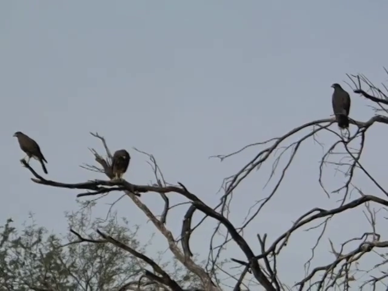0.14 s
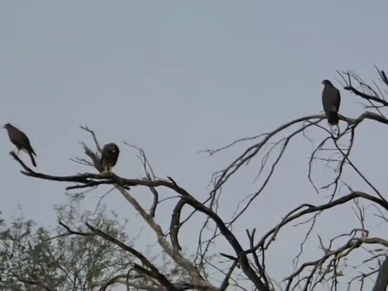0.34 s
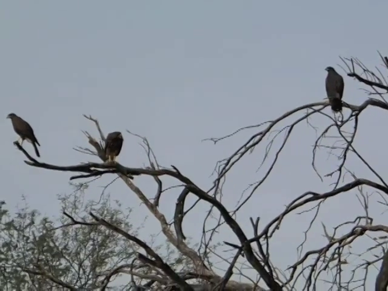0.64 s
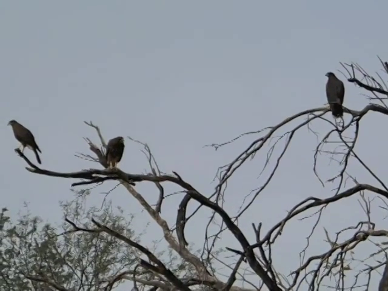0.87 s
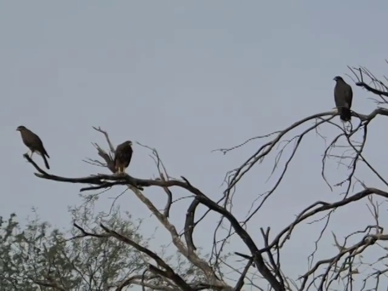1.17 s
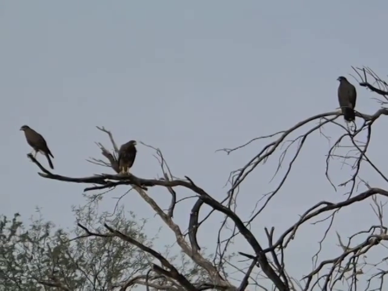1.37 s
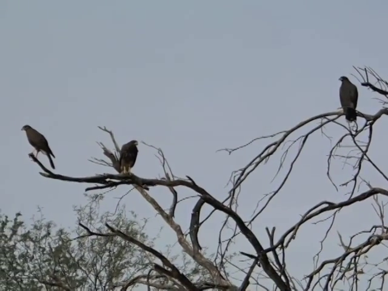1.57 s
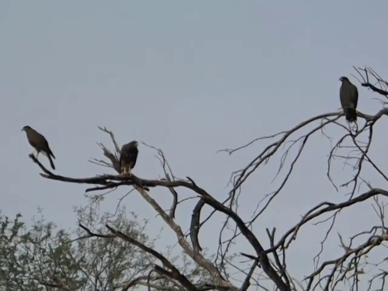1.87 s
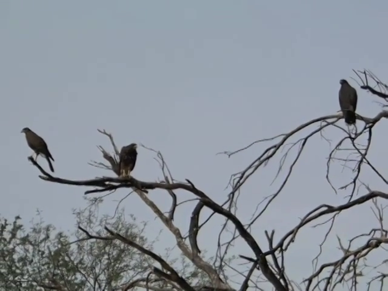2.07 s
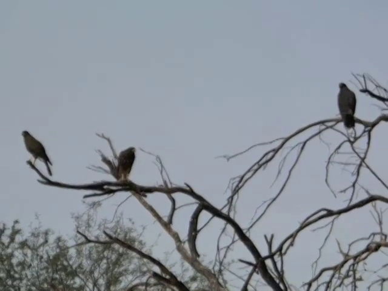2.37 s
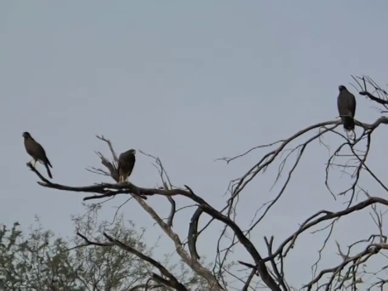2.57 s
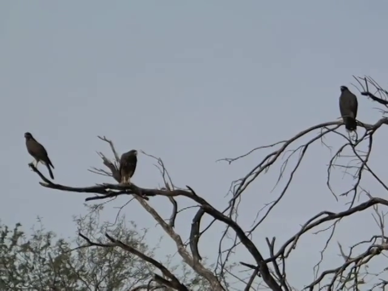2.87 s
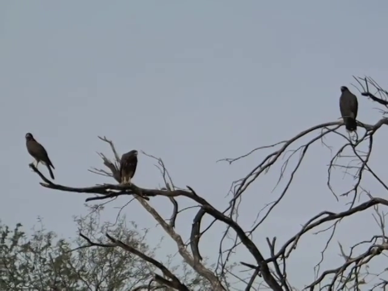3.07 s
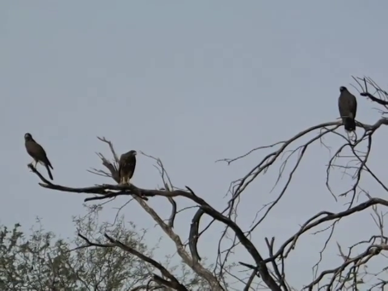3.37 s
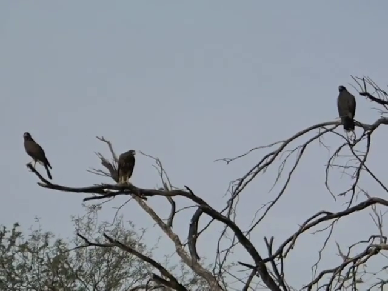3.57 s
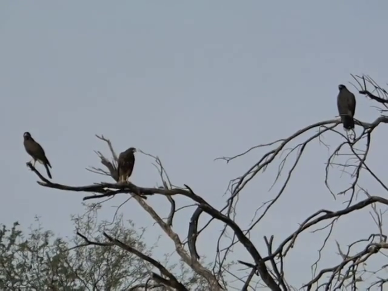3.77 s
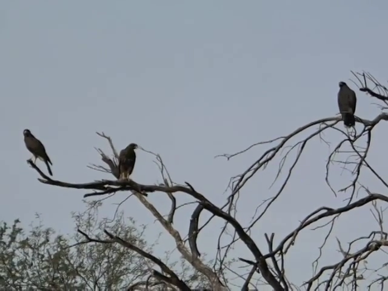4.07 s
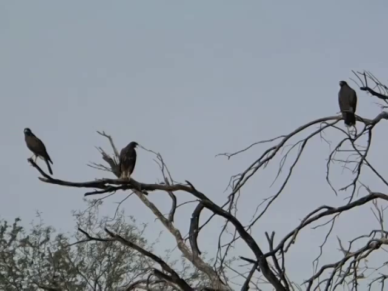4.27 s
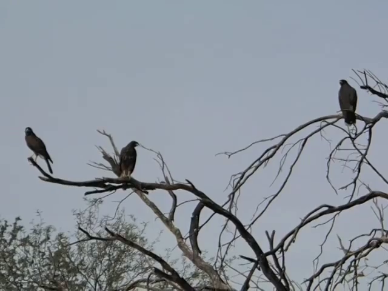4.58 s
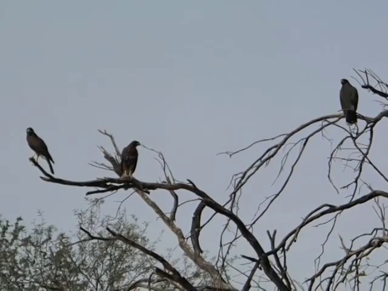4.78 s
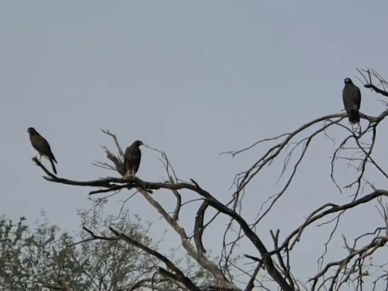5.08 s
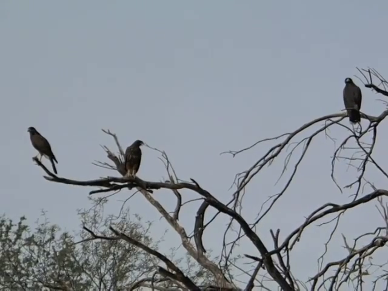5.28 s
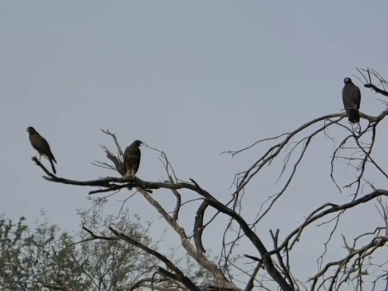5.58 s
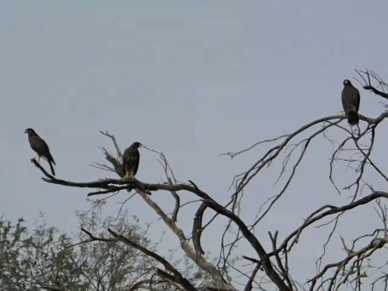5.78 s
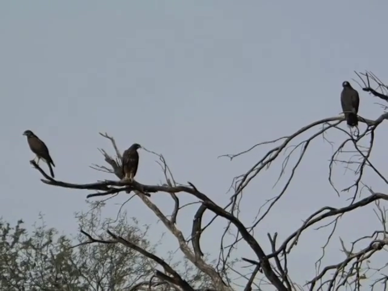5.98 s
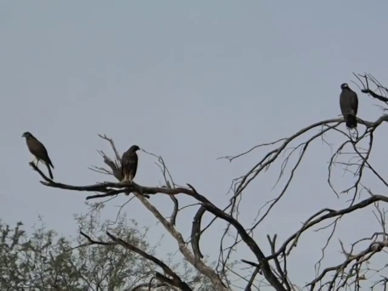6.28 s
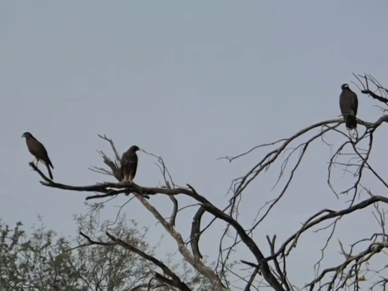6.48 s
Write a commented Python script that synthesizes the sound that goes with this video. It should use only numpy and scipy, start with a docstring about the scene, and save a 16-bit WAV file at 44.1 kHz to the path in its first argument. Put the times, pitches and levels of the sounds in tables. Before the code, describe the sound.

A young hawk gives five shrill rising squeals in open desert, with distant dull shots, tiny bird chirps, and camera lens ticking close by.

```python
"""A hawk gives five rising squeals in open desert: one membrane sings a gliding line with harmonics.
A second, unsteady membrane adds a rasp and leads in three lower openings; the scrub echoes the calls.
A small bird chirps in fluttering arches; shots pop far away, each a dull crack and a decaying noise.
Right beside the microphone a lens drive whines in short steps, and knocks ring the camera housing.
Underneath lie shaped noise for air and hiss, and a faint low drone."""
import sys
import numpy as np
from scipy import signal
from scipy.fft import rfft, irfft, next_fast_len
from scipy.io import wavfile
from scipy.ndimage import map_coordinates

SR = 44100
rng = np.random.default_rng(int(sys.argv[2]) if len(sys.argv) > 2 else 0)


def generate_wav(sig):
    """Save sig (samples, or channels by samples) to the path in sys.argv[1] as 16-bit PCM at SR."""
    pcm = np.round(np.clip(np.atleast_2d(sig).T, -1, 1) * 32767).astype(np.int16)
    wavfile.write(sys.argv[1], SR, pcm)


N = 292824


def amp(db):
    """Decibels to gain."""
    return 10 ** (np.asarray(db) / 20)


def unit(x):
    """Scale to rms 1."""
    return x / np.sqrt(np.mean(x ** 2) + 1e-20)


def along(points, hz):
    """Interpolate (f/Hz, value) points on a log frequency axis."""
    f, v = np.transpose(points)
    return np.interp(np.log(hz + 1), np.log(f + 1), v)


def wobble(rate, size):
    """A smooth random curve, rate knots a second."""
    knots = rng.standard_normal(int(size * rate / SR) + 4)
    return map_coordinates(knots, [np.arange(size) * rate / SR])


def filtered(x, response):
    """Filter x by a complex response of frequency."""
    size = x.shape[-1]
    m = next_fast_len(size + 8192)  # room for the filter to ring out
    return irfft(rfft(x, m) * response(np.fft.rfftfreq(m, 1 / SR)), m)[..., :size]


def noise(spectrum, size):
    """Noise of rms 1, coloured by (f/Hz, level/dB) points."""
    return unit(filtered(rng.standard_normal(size), lambda hz: amp(along(spectrum, hz))))


def resonances(modes, f):
    """Causal response of damped modes: (f/Hz, width/Hz, level/dB)."""
    return sum(amp(db) * 1j * f * w / (c * c - f * f + 1j * f * w) for c, w, db in modes)


def sine(hz):
    """A tone of rms 1 on a pitch curve."""
    return np.sqrt(2) * np.sin(2 * np.pi * np.cumsum(hz) / SR)


def faded(x, edge, release=None):
    """Soft start and stop, in seconds; the stop is as long as the start unless given."""
    t = np.arange(len(x)) / SR
    return x * np.clip(np.minimum(t / edge, (t[-1] - t) / (release or edge)), 0, 1)


def add(track, s, x):
    """Mix x into the track at time s."""
    part = track[max(round(s * SR), 0):][:len(x)]
    part += x[:len(part)]


def leaning(lean, hz):
    """Left and right gains that share out a level difference by frequency."""
    return amp(np.array([[.5], [-.5]]) * along(lean, hz))


def placed(x, lean, lead_ms):
    """Two microphone ports: a level difference by frequency and a small lead on the left."""
    side = np.array([[.5], [-.5]])
    return filtered(x, lambda hz: leaning(lean, hz) * np.exp(2j * np.pi * hz * side * lead_ms / 1000))


# colour of the distant air: f/Hz, level/dB
AIR_COLOUR = [(15, -79), (25, -33), (70, -12), (124, -6), (156, -7.5), (252, -8), (409, -8), (441, -7),
              (486, -8), (535, -7.5), (866, -7.5), (1070, -9), (2500, -16.5), (3250, -32), (5500, -120)]
# colour of the microphone hiss: f/Hz, level/dB
HISS_COLOUR = [(1500, -7.5), (2500, 1), (3400, 0.5), (4050, -7), (4700, 0), (5500, 4.5), (6500, -1.5),
               (8000, -3.5), (12000, -4), (15800, -5.5)]
# likeness of the two microphone ports: f/Hz, likeness (1 = the same)
PORT_LIKENESS = [(60, 0.99), (150, 0.65), (380, 0.068), (950, 0.1), (2380, 0.012), (5980, 0.22),
                 (15000, 0.02)]
# balance of the background: f/Hz, left minus right level/dB
BACKGROUND_LEAN = [(60, -3), (150, -4.5), (380, -4.5), (950, -5), (2380, -4), (5980, -3), (15000, -4.5)]


def background():
    """Distant air and microphone hiss as partly shared noise in two ports, with a faint low drone."""
    air = np.array([amp(-55.5) * noise(AIR_COLOUR, N) + amp(-55.5) * noise(HISS_COLOUR, N) for _ in range(2)])

    def mid_side_gains(hz):
        angle = np.arccos(np.clip(along(PORT_LIKENESS, hz), -.85, .85)) / 2
        return np.array([np.cos(angle), np.sin(angle)])

    mid, side = filtered(air * amp(0.21 * wobble(3.33, N)), mid_side_gains)
    drone = sine(132 + 4 * wobble(23, N))
    mid = mid + amp(-70.5 + 0.5 * wobble(4.53, N)) * drone
    return filtered(np.array([mid + side, mid - side]), lambda hz: leaning(BACKGROUND_LEAN, hz))


# the lens drive hunts for focus in runs of evenly spaced ticks:
# first tick t/s, last tick t/s, motor whine before each tick f/Hz, motor whine after it f/Hz
FOCUS_RUNS = [(1.5444, 1.5444, 4760, 4800), (1.6107, 1.8774, 6230, 6230), (2.4448, 2.4448, 4760, 4800),
              (2.5111, 2.5778, 6240, 6240), (2.645, 2.9118, 6230, 4810), (2.9785, 3.5788, 4820, 6210)]
TICK_PERIOD_S = .0667


def tick_beat():
    """The steady beat of the focus runs: (t/s, whine before f/Hz, whine after f/Hz) for each tick."""
    return [(s, *whines) for first, last, *whines in FOCUS_RUNS
            for s in np.arange(first, last + TICK_PERIOD_S / 2, TICK_PERIOD_S)]


# single knocks of the lens, off the beat: t/s, low modes level/dB, high modes level/dB
KNOCKS = [(0.2123, -50, -42), (0.2141, -47, -31.5), (1.409, -64, -49), (1.4405, -41.5, -44.5),
          (2.104, -40.5, -45), (2.3133, -35.5, -27.5), (2.319, -42, -46.5), (2.3275, -31.5, -27),
          (2.682, -51, -52), (3.6434, -64, -51.5), (3.8845, -64, -46.5)]
# low and high modes of the camera housing: f/Hz, width/Hz, level/dB
HOUSING_LOW = [(980, 89, 0.5), (1270, 105, -0.5), (1993, 400, 4.5), (2675, 134, 9.5), (3540, 110, 1.5)]
HOUSING_HIGH = [(5140, 820, 2), (6400, 670, -5), (8140, 700, -1)]
TICK_LOW_DB, TICK_HIGH_DB, TICK_SCATTER_DB = -41, -41.5, .6  # mean levels; scatter is a standard deviation


def lens_ticks():
    """Each tick or knock is a sharp contact and a faint scrape that ring the camera housing."""
    out, t = np.zeros(N), np.arange(1024) / SR

    def burst(x):
        """Give the burst the energy of 5 ms at rms 1."""
        return x * np.sqrt(.005 * SR) / np.linalg.norm(x)

    def path(f):
        """Bending waves bring the treble first; the plastic damps the very top."""
        return np.exp(-2j * np.pi * .13 * np.sqrt(f)) / (1 + (f / 8500) ** 4)

    def high_path(f):
        return path(f) * resonances(HOUSING_HIGH, f) * resonances([(5080, 820, 0)], f)

    ticks = []
    for s, *_ in tick_beat():
        levels_db = np.array([TICK_LOW_DB, TICK_HIGH_DB]) + TICK_SCATTER_DB * rng.standard_normal(2)
        ticks.append((s, *levels_db))
    for s, low_db, high_db in ticks + list(KNOCKS):
        scrape_decay = amp(-60 * t / .012) + .25 * amp(-60 * t / .04)
        blow = .05 * rng.standard_normal(len(t)) * scrape_decay
        blow[0] += 1  # the sharp contact
        low = burst(filtered(blow, lambda f: path(f) * resonances(HOUSING_LOW, f)))
        high = burst(filtered(blow, high_path))
        add(out, s - .0008, amp(low_db) * low + amp(high_db) * high)
    return out


# the lens slides: t/s, length/s, level/dB
SLIDES = [(0.221, 0.0426, -43.5), (3.637, .065, -62)]
STEP_S, STEP_DB, STEP_SCATTER_DB = 0.023, -56, 1.1  # the motor steps twice for each tick
# one long move of the motor, ending just before the hardest knocks
TRAVEL_START_S, TRAVEL_END_S, TRAVEL_HZ, TRAVEL_DB = 2.084, 2.298, 5780, -55.5


def lens_motor():
    """The motor whines in short steps, before and on each tick, and in one long move; slides rub as noise."""
    out = np.zeros(N)
    whines = []
    for s, before_hz, after_hz in tick_beat():
        for lead, hz in ((TICK_PERIOD_S / 2, before_hz), (0, after_hz)):
            whines.append((s - lead, STEP_S, hz, STEP_DB + STEP_SCATTER_DB * rng.standard_normal()))
    whines.append((TRAVEL_START_S, TRAVEL_END_S - TRAVEL_START_S, TRAVEL_HZ, TRAVEL_DB))
    for s, length, hz, db in whines:
        pitch = hz * (1 + 0.0012 * wobble(430, int(length * SR)))
        add(out, s, amp(db) * faded(sine(pitch), edge=0.0012))
    for s, length, db in SLIDES:
        grit = rng.standard_normal(int(length * SR))
        rub = filtered(grit, lambda f: resonances([(5570, 950, 0)], f) ** 2)
        add(out, s, amp(db) * faded(unit(rub), edge=.002))
    return out


# a small bird's arched chirps: t/s, length/s, top f/Hz, level/dB
CHIRPS = [(0.278, 0.045, 4650, -61), (3.897, 0.04, 5450, -56), (5.342, 0.03, 4600, -53),
          (5.826, 0.0565, 5300, -54), (5.917, 0.029, 4530, -59.5), (6.326, .04, 4900, -67),
          (6.368, 0.028, 4500, -61)]


def small_bird():
    """Each chirp rises and falls in one fluttering arch."""
    out = np.zeros(N)
    for s, length, top_hz, db in CHIRPS:
        u = np.linspace(-1, 1, int(length * SR))
        tone = sine(top_hz * (1 - 0.122 * u ** 2 + 0.019 * wobble(700, len(u))))
        add(out, s, amp(db + 1.6 * wobble(220, len(u))) * faded(tone, edge=0.011))
    return out


# colour of the turbulence in the hawk's throat: f/Hz, level/dB
THROAT_COLOUR = [(1200, -23), (2100, -19), (2620, -5), (3000, -13), (3900, -13), (4450, -8.5), (4750, -12),
                 (5200, -3.5), (5550, 4), (5850, -20), (6400, -9), (7200, -21), (9800, -20.5), (14000, -35)]
OPENING_RISE_HZ, OPENING_SWELL_DB, OPENING_SAG_DB = 245, 12.5, 7.5


def opening(length, start_hz, loudest, level_db, octave_db):
    """Before the voice breaks upward the lower membrane leads, with its octave; the upper one only stirs."""
    size = int(length * SR)
    u = np.linspace(0, 1, size)
    hz = (start_hz + OPENING_RISE_HZ * u) * (1 + 0.0045 * wobble(543, size))
    swell_db = np.interp(u, [0, min(loudest, 1), 1], [-OPENING_SWELL_DB, 0, -OPENING_SAG_DB])
    swell_db = swell_db + 1.9 * wobble(174, size)
    stir_hz = hz + 900 + 80 * wobble(580, size)
    stir_tones = amp(-5.5) * sine(stir_hz) + sine(stir_hz + hz)
    stir = amp(-5.0) * np.linspace(1, .15, size) * stir_tones
    harmonics = amp(-17) * sine(3 * hz) + amp(-25) * sine(4 * hz)
    voice = sine(hz) + stir + harmonics + amp(-12.0) * noise(THROAT_COLOUR, size)
    call = amp(level_db) * voice + amp(octave_db) * sine(2 * hz)
    return faded(amp(swell_db) * call, edge=.012, release=.001)


def dip_db(dips, hz):
    """Loss along a pitch curve as it passes through echo dips."""
    return sum(db * np.exp(-((hz - centre) / width) ** 2) for centre, width, db in dips)


# echoes cancel the line as it glides through certain pitches: f/Hz, width/Hz,
# loss/dB (for the line, at dip depth 1)
LINE_DIPS = [(3295, 22.4, 10), (3346, 13, 11)]
OCTAVE_DIPS = [(6530, 55, 5)]
FALL_S, FALL_HZ = .06, 463  # every squeal ends in a quickening drop of pitch
ATTACK_DB, ATTACK_S = 6.5, 0.051  # the voice starts this much weaker and catches up
PUSH_DB, PUSH_WIDTH = 1.5, 0.067  # a last push at the top of the rise; its width is a share of the rise
SWELL_DB, OCTAVE_SWELL_DB = 3, 5  # growth along the rise: the call turns shrill


def squeal(length, start_hz, top_hz, bend, level_db, octave_db, rasp_db, rasp_growth_db,
           dip_depth, third_db, strand_db):
    """The main membrane's line rises, swells and drops; a lower, unsteady one beats with it and rasps."""
    size = int(length * SR)
    t = np.arange(size) / SR
    rise = np.minimum(t / (length - FALL_S), 1)
    fall = np.maximum(1 - (length - t) / FALL_S, 0)
    glide_hz = start_hz + (top_hz - start_hz) * rise ** bend - FALL_HZ * fall ** 2.22
    hz = glide_hz * (1 + 0.0014 * wobble(167.2, size) + 0.00046 * wobble(700, size))

    attack_db = ATTACK_DB * np.exp(-t / ATTACK_S)
    push_db = PUSH_DB * np.exp(-((t / (length - FALL_S) - 1) / PUSH_WIDTH) ** 2)

    def swell(growth_db):
        return push_db - attack_db - growth_db * (1 - rise)

    settled = 1 - np.minimum(2 * fall, 1)  # the final drop is too quick for echoes to cancel it
    line_loss_db = dip_depth * settled * dip_db(LINE_DIPS, hz)
    line = amp(level_db + swell(SWELL_DB) - line_loss_db + .9 * wobble(45, size))
    octave_loss_db = settled * dip_db(OCTAVE_DIPS, hz)
    octave = amp(octave_db + swell(OCTAVE_SWELL_DB) - octave_loss_db + 1.9 * wobble(50, size))
    # the third harmonic is set against the geometric mean of line and octave
    upper = np.sqrt(line * octave) * amp(third_db + 2.5 * wobble(35, size))
    clean = line * sine(hz) + octave * sine(2 * hz) + upper * (sine(3 * hz) + amp(-11) * sine(4 * hz))

    rasp_db = rasp_db + swell(rasp_growth_db) + 1.1 * wobble(45, size)
    # pushed hard, the lower membrane steadies and its sidebands stand out of the noise
    locked = np.clip((rasp_db + 51) / 7, 0, 1)
    jitter_hz = 20 * wobble(50, size) + 110 * (1 - .55 * locked) * wobble(900, size)
    low_hz = 2640 + .3 * (hz - 3320) + jitter_hz
    strands = (amp(-8.0) * sine(low_hz) + amp(-0.5) * sine(hz + low_hz)
               + amp(-16) * sine(2 * low_hz) + amp(-25.5) * sine(2 * hz + low_hz)
               + amp(-23.5) * sine(3 * hz - low_hz) + amp(strand_db) * sine(4 * hz - low_hz))
    turbulence = amp(-.5 - 3.5 * locked) * noise(THROAT_COLOUR, size)
    flutter = amp(3.5 * wobble(200, size))
    rasp = amp(rasp_db) * (flutter * strands + turbulence)
    return faded(clean + rasp, edge=0.0032, release=.023)


# squeals: t/s, length/s, start f/Hz, top f/Hz, bend of the rise (1 = straight), line level/dB,
# octave level/dB, rasp level/dB, growth of the rasp/dB, depth of the echo dips (0-1),
# third harmonic level/dB, top strand level/dB
SQUEALS = [(0.428, 0.46, 3248, 3361, 2.2, -28, -34, -42.5, 10, 0.22, -30, -21.5),
           (1.603, 0.48, 3089, 3343, 0.76, -27, -33.5, -41.5, 10.8, 0.069, -30.5, -21),
           (2.832, 0.435, 3100, 3380, 1.05, -27.5, -33, -42, 9.1, 0.15, -29, -20),
           (4.048, 0.46, 3014, 3358, .53, -33.5, -37.5, -46, 11, 0.63, -24, -27),
           (5.256, 0.435, 2995, 3386, .6, -33, -40, -46, 16, 0.92, -27, -26)]
# low-register openings: t/s, length/s, start f/Hz, loudest at share of length, level/dB, octave level/dB
OPENINGS = [(0.344, 0.086, 2344, 0.41, -37.5, -32), (2.781, 0.054, 2295, 0.75, -36, -36.5),
            (3.999, 0.051, 2285, 0.97, -41, -44)]


def hawk():
    """All calls from one perch: squeals, three of them led in by a low opening."""
    out = np.zeros(N)
    for s, *call in SQUEALS:
        add(out, s, squeal(*call))
    for s, *call in OPENINGS:
        add(out, s, opening(*call))
    return out


# decay of the echo in the scrub: f/Hz, time to fall 60 dB/s
SCRUB_DECAY = [(500, 0.23), (3200, 0.86), (6500, 0.46), (12000, 0.022)]


def scrub_echo(x):
    """Brush and ground scatter the sound back as decaying noise, longest-lived near 3.2 kHz."""
    hz, t, z = signal.stft(rng.standard_normal((2, SR)), SR, nperseg=256)
    decay = amp(-60 * t / along(SCRUB_DECAY, hz)[:, None]) + 1.7 * amp(-60 * t / .17)
    tail = signal.istft(z * decay, SR, nperseg=256)[1]
    tail = tail / np.linalg.norm(tail[0])
    delayed = np.pad(x, (500, 0))[None]  # about 11 ms
    return signal.fftconvolve(delayed, tail, axes=1)[:, :N]


# distant shots: t/s, crack peak level/dB, rolling echo level/dB
SHOTS = [(.832, -36, -48), (.870, -42, -49.5), (1.049, -32, -58), (1.067, -37, -58), (1.62, -48, -49.5),
         (1.831, -34.5, -49.5)]
# colour of the rolling echo: f/Hz, level/dB
SHOT_COLOUR = [(150, -38), (400, -5), (800, -4), (1400, -3), (2200, -10.5), (4000, -35)]


def shots():
    """A dull crack with its echo scattered over the plain as decaying noise."""
    out, t = np.zeros(N), np.arange(SR // 2) / SR
    for s, crack_db, roll_db in SHOTS:
        u = t / 0.00022
        crack = filtered((1 - u) * np.exp(-u), lambda f: resonances([(900, 630, 0)], f))
        decay = amp(-60 * t / 0.12) + 0.36 * amp(-60 * t / 1.9)
        roll = noise(SHOT_COLOUR, len(t)) * decay * amp(1.3 * wobble(140.5, len(t)))
        add(out, s, amp(crack_db) * crack / np.abs(crack).max() + amp(roll_db) * roll)
    return out


# the camera body thuds after the hardest knocks
THUD_AT_S, THUD_T60_S, THUD_HZ, THUD_DB = 2.33, .2, 65.3, -54


def body_thud():
    """One low, quickly damped swing of the camera body."""
    out, t = np.zeros(N), np.arange(SR // 4) / SR
    swing = amp(THUD_DB - 60 * t / THUD_T60_S) * np.sin(2 * np.pi * THUD_HZ * t)
    add(out, THUD_AT_S, faded(swing, edge=.015))
    return out


def scene():
    """Birds and shots lean slightly right; the camera, at the microphone, has its treble on the right."""
    birds = hawk() + small_bird()
    # leans: f/Hz, left minus right level/dB
    far = placed(birds + shots(), [(1200, -3.0), (3200, -4.5), (6400, -2.0)], lead_ms=0.0077)
    echo = amp(-16.5) * scrub_echo(birds) * amp([[-2.1], [2.1]])  # left, right
    camera = lens_ticks() + lens_motor() + body_thud()
    near = placed(camera, [(1000, 7), (3000, -11.5), (5500, -9.5)], lead_ms=-0.051)
    return far + echo + near + background()


TOP_HZ = 15780  # band limit


def record(dry):
    """The microphone sheds the deep bass; nothing is kept above the band limit."""
    return filtered(dry, lambda hz: (hz < TOP_HZ) * hz ** 2 / np.sqrt(hz ** 4 + 56 ** 4))


dry = scene()
out = record(dry)
generate_wav(out)
```